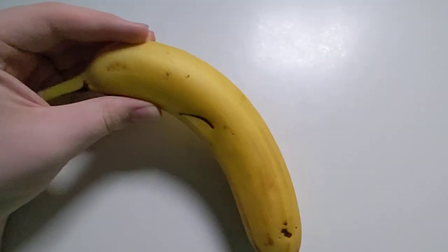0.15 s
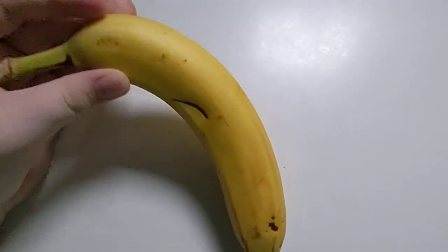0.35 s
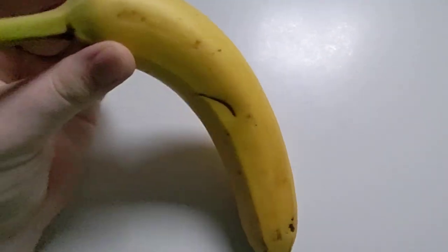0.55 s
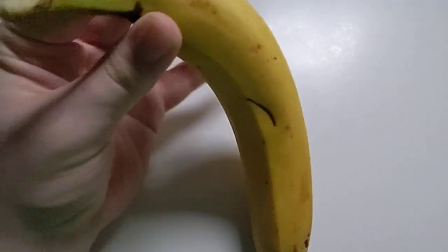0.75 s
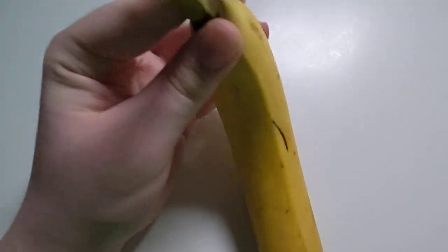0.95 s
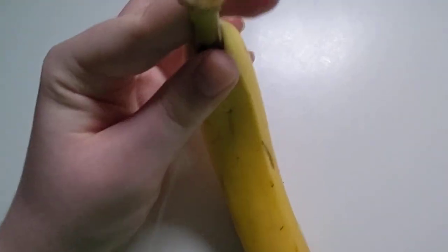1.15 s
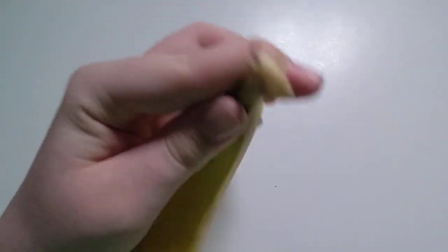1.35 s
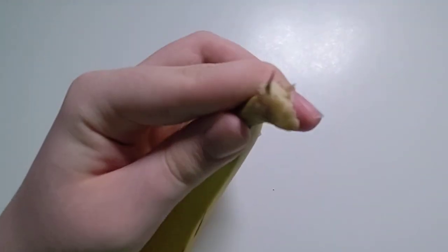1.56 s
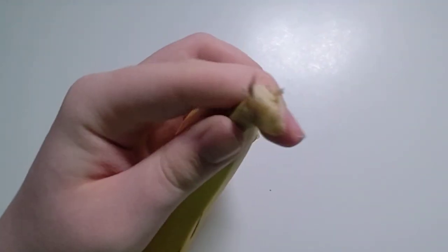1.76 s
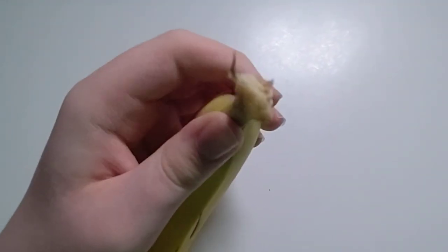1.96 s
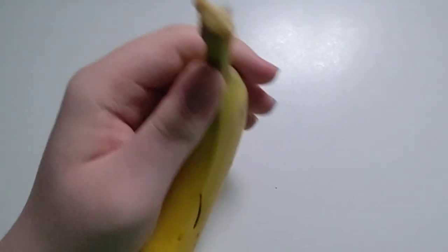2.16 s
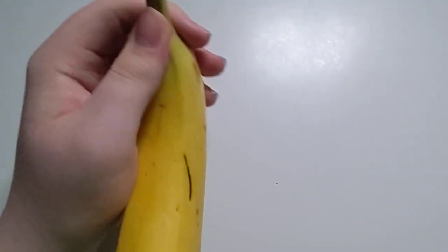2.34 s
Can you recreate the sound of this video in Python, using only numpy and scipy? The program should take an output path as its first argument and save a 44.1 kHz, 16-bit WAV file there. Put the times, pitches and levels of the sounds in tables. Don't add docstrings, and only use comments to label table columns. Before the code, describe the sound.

A banana's tip knocks a table once with a dull thump, then faint peel rustles follow

```python
import sys
import numpy as np
from scipy import signal
from scipy.fft import rfft, irfft
from scipy.io import wavfile

SR = 44100
rng = np.random.default_rng(int(sys.argv[2]) if len(sys.argv) > 2 else 0)


def log_audio(samples):
    frames = np.atleast_2d(samples).T
    limited = np.clip(frames, -1, 1)
    pcm = np.round(limited * 32767).astype(np.int16)
    wavfile.write(sys.argv[1], SR, pcm)


def level_to_linear(level):
    exponent = np.asarray(level, float) / 20
    return 10 ** exponent


N = 110250


def rms_one(x):
    return x / np.sqrt(np.mean(x ** 2) + 1e-20)


def at_hz(points, hz):
    table_hz, value = np.transpose(points)
    return np.interp(np.log(hz), np.log(table_hz), value)


def drift(rate):
    pole = np.exp(-80 * np.pi * rate / SR)
    white = rng.standard_normal(N // 40 + 2002)
    slow = signal.lfilter([1], [1, -2 * pole, pole * pole], white)[2000:]
    return np.interp(np.arange(N) / 40, np.arange(len(slow)), rms_one(slow))


def ring(force, hz, t60):
    r, w = level_to_linear(-60 / (t60 * SR)), 2 * np.pi * hz / SR
    return signal.lfilter([0, np.sin(w)], [1, -2 * r * np.cos(w), r * r], force + 1e-18)


def resonance(x, hz, width_hz):
    r = np.exp(-np.pi * width_hz / SR)
    poles = [1, -2 * r * np.cos(2 * np.pi * hz / SR), r * r]
    return signal.lfilter([(1 - r * r) / 2, 0, (r * r - 1) / 2], poles, x)


def double_resonance(x, hz, width_hz):
    return resonance(resonance(x, hz, width_hz), hz, width_hz)


def pan(db):
    return level_to_linear(np.array([[db / 2], [-db / 2]]))


def room_noise():
    # frequency in Hz, left-right likeness from 0 to 1.
    likeness = [(60, 0.58), (180, 0.81), (550, 0.085), (1650, 0.13), (4970, 0), (15000, 0.054)]
    # frequency in Hz, phase by which left leads in radians.
    turn_rad = [(0, 0), (500, -0.07), (1400, -3), (16000, -1)]
    # frequency in Hz, left-right level difference in dB.
    lean_db = [(60, 2.5), (240, -0.5), (950, -0.5), (3770, -2), (15000, -4)]
    hz = np.maximum(np.fft.rfftfreq(N, 1 / SR), 1)
    left, other = rfft(rng.standard_normal((2, N)))
    alike = np.clip(at_hz(likeness, hz), 0, 1)
    lean = level_to_linear(at_hz(lean_db, hz) / 2)
    right = alike * left + np.sqrt(1 - alike ** 2) * other
    right = right * np.exp(-1j * np.interp(hz, *np.transpose(turn_rad)))
    return irfft(np.array([left * lean, right / lean]), N)


def banded(spectrum, gain_db):
    white = [room_noise(), room_noise()]
    bottom, top = spectrum[0][0], spectrum[-1][0]
    edges = np.geomspace(bottom, top, int(2 * np.log2(top / bottom)) + 2)
    out = 0
    for k, (low, high) in enumerate(zip(edges, edges[1:])):
        hz = np.sqrt(low * high)
        band = signal.butter(2, [low, high], "band", fs=SR, output="sos")
        gain = level_to_linear(at_hz(spectrum, hz) + gain_db(hz))
        out = out + gain * signal.sosfilt(band, white[k % 2])
    return out


def table():
    # start in seconds, force in dB, contact length in ms, tilt to upper modes in dB per octave.
    contacts = [(0.197, -59, 4.5, 14), (0.1987, -28.5, 8.64, -7), (0.2061, -33, 1.97, 4),
                (0.2097, -26.5, 4.03, -3), (0.21, -25.5, 12.8, -5.5), (0.2239, -35.9, 2.8, 0.7),
                (0.2293, -37.9, 6.6, 4), (0.2406, -40.5, 1.6, 0), (0.256, -37.5, 1.05, -3.8),
                (0.2583, -52.5, 14, -3), (0.2653, -37, 3.06, 0.5), (0.273, -43.5, 3.5, -3.8),
                (0.2875, -40, 3.52, 1), (0.2883, -32, 16.3, 10), (0.3136, -40.5, 5.8, -2),
                (0.3239, -47.5, 4.9, 7.5), (0.3697, -49, 5.4, 6), (0.3833, -68, 1.8, 7.5),
                (0.4184, -49, 9.2, 9), (0.444, -60, 6.9, -12), (0.555, -58, 24, 9),
                (0.8972, -48.5, 11.4, -1.9), (0.9108, -55.5, 8.5, -2), (0.9213, -66, 7.3, 9.0),
                (1.126, -55, 10.4, 1), (1.5232, -45, 11.2, -11.5), (1.5362, -53.1, 12, -8),
                (1.5534, -52, 8.6, 8), (1.5745, -57, 12, -8), (1.591, -55, 10, -8.5),
                (1.6085, -67, 8.4, -11), (1.6325, -56, 23, -13), (1.6853, -55, 12.3, 14),
                (1.772, -62, 7.2, 1), (1.934, -61, 13, -1)]
    # frequency in Hz, level in dB, t60 in seconds.
    modes = [(55, -17.5, 0.18), (87.3, -3, 0.16), (115.5, -0.8, 0.073), (150.4, 2.3, 0.16),
             (166.2, -5, 0.38), (245, 3.8, 0.024), (261, -13, 0.26), (319, 3, 0.031), (389, 1, 0.028),
             (452, -20, 0.34), (550, -17, 0.12), (630, -11, 0.073), (745, -11.5, 0.083), (1130, -9, 0.052)]
    # frequency in Hz, share in dB.
    side_db = [(60, -22), (150, -19), (300, -18), (600, -2), (1100, -3)]
    # frequency in Hz, left-right level difference in dB.
    lean_db = [(55, -1.5), (90, -0.5), (150, 1), (300, 2.5), (600, -2), (1100, 6)]
    out = np.zeros((2, N))
    for k, (hz, mode_db, t60) in enumerate(modes):
        force = np.zeros(N)
        for s, db, ms, tilt_db in contacts:
            push = np.hanning(int(ms * SR / 1000) + 2)
            start = int(s * SR)
            gain = level_to_linear(db + tilt_db * np.log2(hz / 150))
            force[start:start + len(push)] += gain * push / push.sum()
        mode = (-1) ** (k + 1) * level_to_linear(mode_db) * ring(force, hz, t60)
        quarter_turn = np.gradient(mode) * SR / (2 * np.pi * hz)
        side = level_to_linear(at_hz(side_db, hz)) * quarter_turn
        out += np.array([mode + side, mode - side]) * pan(at_hz(lean_db, hz))
    low_cut = signal.butter(3, 53, "high", fs=SR, output="sos")
    return signal.sosfilt(low_cut, out)


def knock_tail():
    # start in seconds, tail level in dB.
    knocks = [
        (0.205, -48),
        (0.238, -53),
        (0.266, -57),
        (.285, -84),
    ]
    # frequency in Hz, tail density in dB per Hz.
    tail = [(260, -27), (450, 0), (517, -12), (1390, -10), (1540, -17), (2300, -12), (9000, -30),
            (11700, -56), (19800, -120)]
    # frequency in Hz, t60 in seconds.
    tail_t60 = [(300, 0.35), (1000, 0.36), (3000, 0.18), (9000, 0.21)]
    t = np.arange(N) / SR

    def decay_db(hz):
        power = 0
        for s, db in knocks:
            level = np.where(t > s, db - 60 * (t - s) / at_hz(tail_t60, hz), -200)
            power = power + level_to_linear(level) ** 2
        return 10 * np.log10(power)

    steady = np.sqrt(np.mean(banded(tail, lambda hz: 0) ** 2))
    return banded(tail, decay_db) / steady


def ticks():
    # start in seconds, peak in dB, pitch in Hz, t60 in seconds.
    snaps = [(.0154, -44, 13000, .0013), (.0158, -60, 6500, .001), (.0166, -55, 12500, .0017),
             (.0648, -52, 5000, .0016), (.0822, -62, 13500, .003), (.2029, -52, 2300, .0031),
             (.20511, -23, 2480, .0012), (.20512, -36, 4100, .0011), (.20513, -43, 14600, .0018),
             (.20521, -37, 6900, .0046), (.2055, -49, 8800, .0021), (.2141, -57, 7000, .0041),
             (.2184, -53, 4400, .0041), (.4071, -57, 6000, .0021), (.5662, -52, 9000, .0008),
             (.5687, -51, 6000, .001), (.5688, -44, 10000, .0007), (.9007, -54.5, 1430, .017),
             (1.0981, -64, 2120, .017), (1.4541, -50, 1415, .024), (1.4546, -51, 3830, .0021),
             (1.4549, -57, 6000, .0014), (1.4553, -48.5, 8450, .0009), (2.2021, -59, 4000, .0031),
             (2.2461, -53.5, 5000, .0031), (2.4821, -58.5, 5000, .0031)]
    lag_ms = 0.061
    out = np.zeros(N)
    for s, db, hz, t60 in snaps:
        click = np.zeros(N)
        click[int(s * SR)] = level_to_linear(db)
        out += resonance(ring(click, hz, t60), hz, 6.9 / t60)
    late = np.interp(np.arange(N) - lag_ms * SR / 1000, np.arange(N), out)
    return np.array([out, late]) * pan(7.5)


def stick_slip():
    slips_per_s, spread_db, likeness = 6000, 2.5, 0.059
    happens = rng.random((2, N)) < slips_per_s / SR
    size = level_to_linear(spread_db * np.minimum(rng.exponential(1, (2, N)), 3.5))
    slips = happens * size * rng.choice([-1, 1], (2, N))
    slips[1] = likeness * slips[0] + np.sqrt(1 - likeness ** 2) * slips[1]
    return slips


def peel_colour(slips, resonances):
    out = 0
    for k, (hz, width_hz, db) in enumerate(resonances):
        out = out + (-1) ** k * level_to_linear(db) * double_resonance(slips, hz, 1.23 * width_hz)
    return rms_one(out)


def rustle(slips):
    # middle in seconds, rise in seconds, fall in seconds, level in dB, dull share in dB.
    rubs = [(.08, 0.074, 0.12, -82, -6), (0.196, 0.0049, 0.0037, -90, 0), (.225, 0.015, 0.036, -68.5, 1.5),
            (.35, 0.018, 0.014, -68, -5), (.46, 0.05, 0.028, -73.5, -3.5),
            (0.569, 0.0054, 0.0026, -63, -1.5), (.575, .012, 0.034, -75.5, 1.5),
            (.63, 0.26, 0.072, -72, -4.5), (.87, 0.15, 0.06, -73.5, 0), (1.37, 0.1, 0.066, -83.5, 3),
            (1.915, 0.011, 0.03, -82.5, 8.5), (1.957, 0.016, 0.011, -63.5, -5),
            (2.1, 0.013, 0.019, -80, 2.5), (2.3, 0.022, 0.044, -71, 2), (2.35, 0.027, 0.035, -70.5, -2),
            (2.42, .03, 0.043, -82.5, 3)]
    # frequency in Hz, width in Hz, level in dB.
    peel_bright = [(14760, 880, 14.5), (12220, 3850, 12)]
    # frequency in Hz, width in Hz, level in dB.
    peel_dull = [(7000, 1450, -0.5), (9470, 2130, -1.5), (5080, 3140, -10), (3050, 4060, -2.5)]
    t = np.arange(N) / SR
    bright_power = dull_power = 0
    for s, rise, fall, db, dull_db in rubs:
        span = np.where(t < s, rise, fall)
        stroke = level_to_linear(db) ** 2 * np.exp(-np.abs((t - s) / span) ** 1.46)
        bright_power = bright_power + stroke
        dull_power = dull_power + stroke * level_to_linear(dull_db) ** 2
    bright = np.sqrt(bright_power) * peel_colour(slips, peel_bright)
    return bright + np.sqrt(dull_power) * peel_colour(slips, peel_dull)


def sizzle(slips):
    # middle in seconds, half length in seconds, level in dB, pitch in Hz, width in Hz.
    sizzles = [(0.217, .006, -63, 13500, 1200), (0.334, 0.018, -88, 11500, 900),
               (.46, .02, -73, 13140, 800), (0.596, 0.033, -80, 13900, 1199), (.67, 0.035, -76, 11900, 700),
               (.76, 0.055, -84, 13700, 1000), (0.85, 0.034, -76, 13600, 1000),
               (1.935, .015, -77, 6700, 900), (1.952, .012, -67, 14400, 1200),
               (2.298, 0.02, -85, 7000, 600), (2.308, .012, -72, 13600, 900), (2.31, 0.033, -78, 5350, 500),
               (2.336, 0.044, -80, 9100, 900), (2.355, 0.028, -80, 13500, 1800)]
    t = np.arange(N) / SR
    out = 0
    for s, half, db, hz, width_hz in sizzles:
        swell = level_to_linear(db) * np.exp(-((t - s) / half) ** 2)
        out = out + swell * rms_one(double_resonance(slips, hz, width_hz))
    return out


def finger_slides():
    slips = stick_slip()
    flicker = level_to_linear(0.8 * drift(70))
    return flicker * pan(5) * (rustle(slips) + sizzle(slips))


def creak():
    # middle in seconds, half length in seconds, level in dB.
    s, half, db = (1.078, 0.039, -71)
    # frequency in Hz, width in Hz.
    creak_rings = [(1100, 340), (2250, 290)]
    air = room_noise()
    swell = level_to_linear(db) * np.exp(-((np.arange(N) / SR - s) / half) ** 2)
    return swell * rms_one(sum(double_resonance(air, hz, w) for hz, w in creak_rings))


def wavering_tones(air, rows):
    out = 0
    for hz, width_hz, db in rows:
        gain = level_to_linear(db + 1.1 * drift(3.6))
        out = out + gain * rms_one(double_resonance(air, hz, width_hz))
    return out


def background():
    # frequency in Hz, hiss density in dB per Hz.
    hiss_spectrum = [(900, 4), (1400, -17), (2000, -4), (3000, -5), (4500, -1.5), (7000, -6), (10500, -9),
                     (15800, -7)]
    # frequency in Hz, rumble density in dB per Hz.
    rumble_spectrum = [(15, -42), (25, -10), (91, -0.5), (175, -8.5), (208, -1.5), (344, -8.5), (954, -13),
                       (1380, -15), (2500, -19), (3250, -58), (5500, -120)]
    # time in seconds, level in dB.
    load = [(0, -80), (.2, -80.5), (.24, -70), (.64, -75), (1.1, -72), (1.3, -72.5), (1.45, -72),
            (1.62, -73.5), (1.94, -74.5), (2.27, -73), (2.5, -73.5)]
    # frequency in Hz, width in Hz, level in dB.
    whines = [(3285, 195, -80.5), (5540, 6, -91.5), (7000, 1100, -85.5), (2297, 110, -88.5)]
    # frequency in Hz, width in Hz, level over load in dB.
    hums = [(203.2, 13.4, -6.5), (1284, 210, -8), (97.4, 25, -7.5), (283, 61, -15), (595, 158, -6)]
    load_db = np.interp(np.arange(N) / SR, *np.transpose(load))
    hiss = level_to_linear(-75.5) * rms_one(banded(hiss_spectrum, lambda hz: 0.53 * drift(10)))
    rumble = level_to_linear(4) * rms_one(banded(rumble_spectrum, lambda hz: 0.73 * drift(30)))
    air = room_noise()
    whine = wavering_tones(air, whines)
    hum = wavering_tones(air, hums)
    return hiss + level_to_linear(load_db) * (rumble + hum) + whine


def scene():
    return table() + knock_tail() + ticks() + finger_slides() + creak() + background()


def band_limit(x):
    return signal.sosfilt(signal.butter(12, 16340, fs=SR, output="sos"), x)


def record(dry):
    top_cut = signal.cheby2(20, 60, 16250, fs=SR, output="sos")
    mix = signal.sosfilt(top_cut, dry)
    return band_limit(mix)


dry = scene()
out = record(dry)
log_audio(out)
```